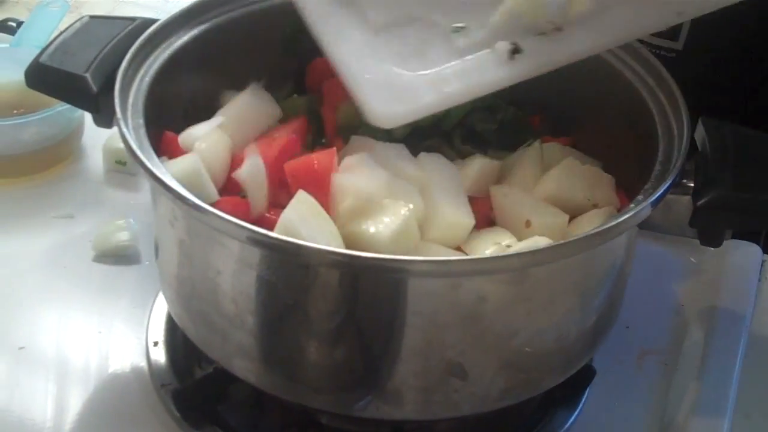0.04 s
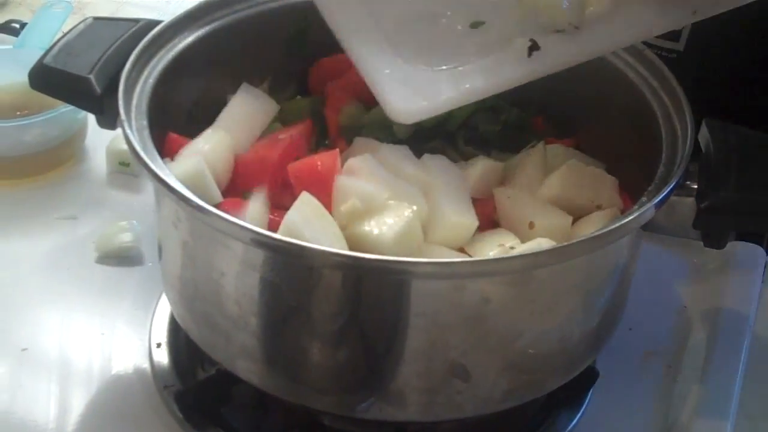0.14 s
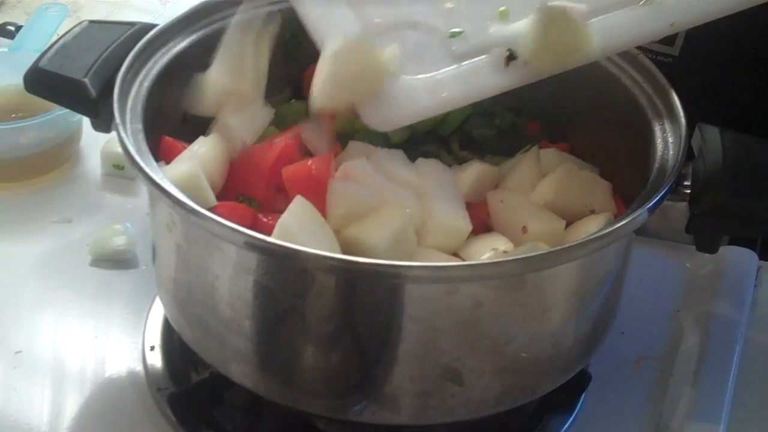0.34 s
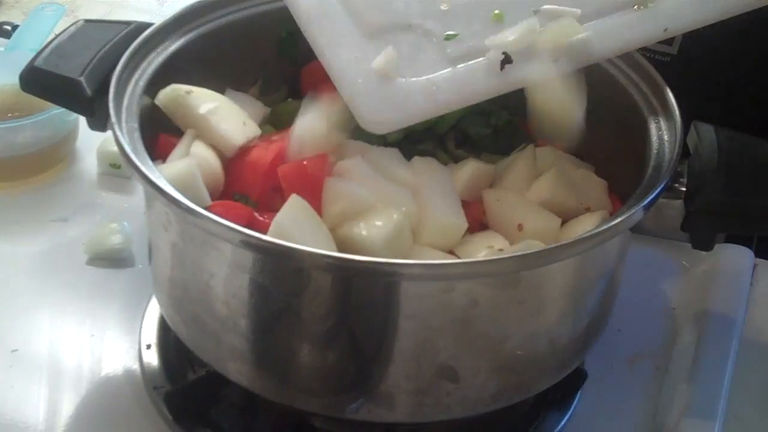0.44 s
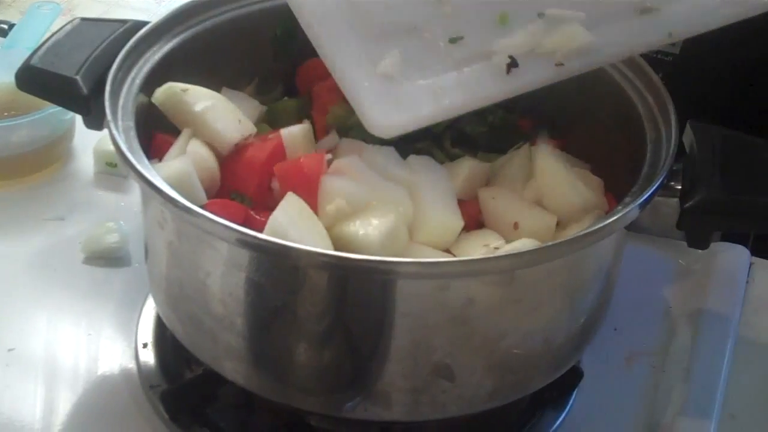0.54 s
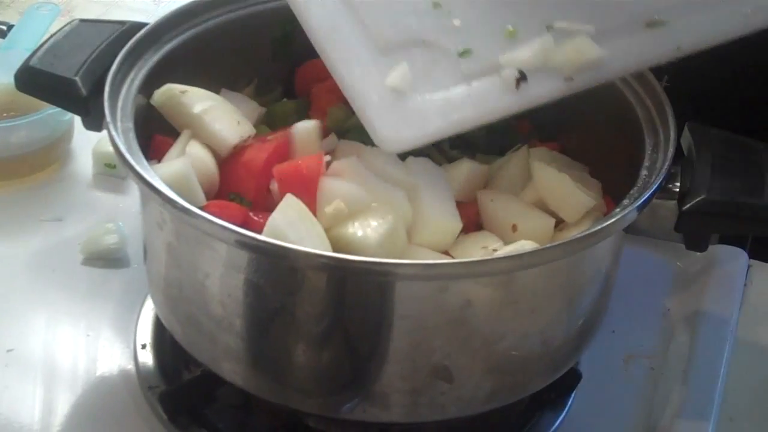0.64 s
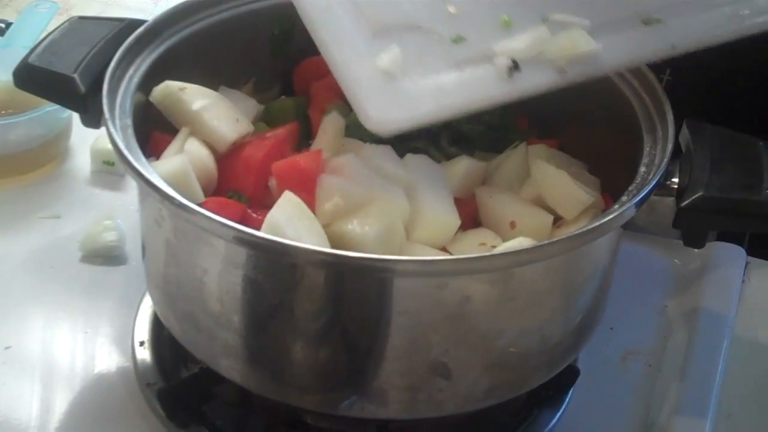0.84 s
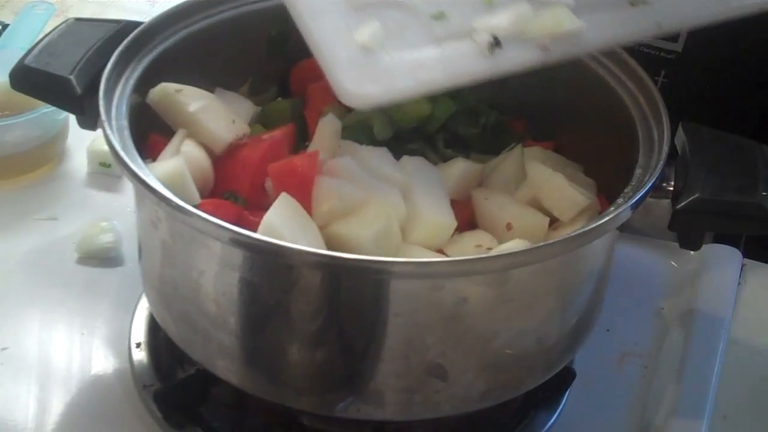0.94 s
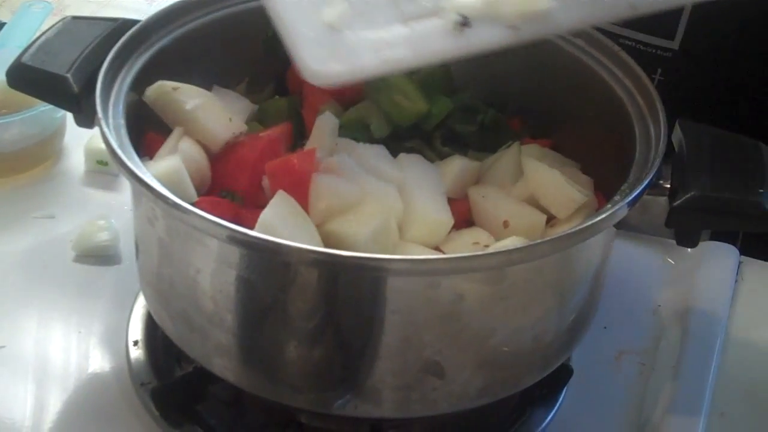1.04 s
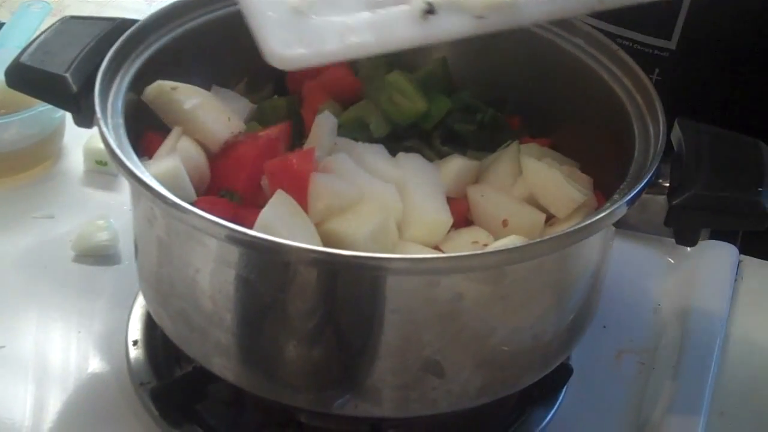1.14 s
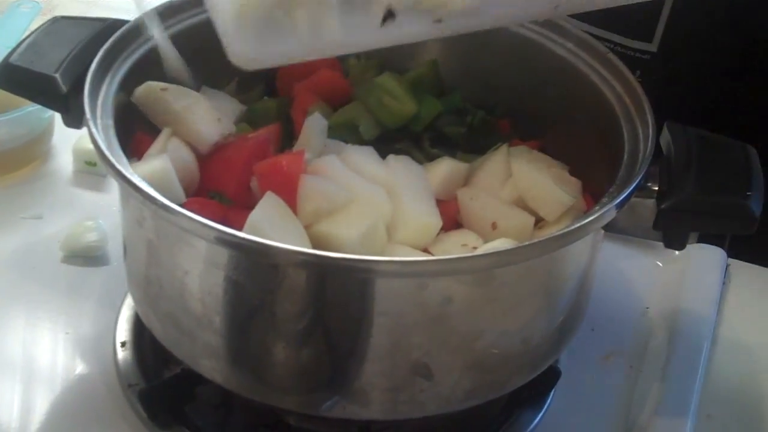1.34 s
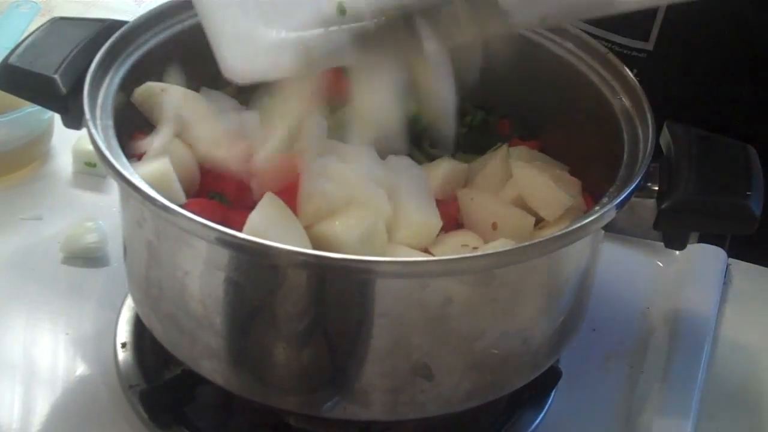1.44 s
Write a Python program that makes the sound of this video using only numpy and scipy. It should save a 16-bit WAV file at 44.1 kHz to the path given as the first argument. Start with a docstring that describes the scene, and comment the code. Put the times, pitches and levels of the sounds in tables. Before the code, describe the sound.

Two ringing knocks and a scrape of a plastic board on a pot, over faint sizzling.

```python
"""A faint sizzle, and bits of onion patting into a steel pot of vegetables in a small kitchen. One piece
brushes the pot wall and rings one faint high note. A plastic cutting board knocks twice on the rim to shed the
onion: it cracks and clacks, the pot rings. It then scrapes along the rim, tiny slips rasping the plastic and
ringing the steel, and slips off with a tick."""
import sys
import numpy as np
from scipy import signal
from scipy.io import wavfile

SR = 44100
rng = np.random.default_rng(int(sys.argv[2]) if len(sys.argv) > 2 else 0)


def transcribe(signal):
    """Save signal, clipped to [-1, 1], as a 16-bit WAV file at the path in sys.argv[1]."""
    frames = np.atleast_2d(signal).T
    limited = np.clip(frames, -1, 1)
    pcm = np.round(limited * 32767).astype(np.int16)
    wavfile.write(sys.argv[1], SR, pcm)


N = 66150
T = np.arange(N) / SR

# Sizzle spectrum: f/Hz, relative level/dB
SIZZLE_SPECTRUM = [(100, -17.5), (330, -6.5), (450, -11), (550, 0.5), (700, -18.5), (1060, 3.5), (1200, -3),
                   (1600, 5), (2250, -5.5), (3050, 4), (3800, -9.5), (5500, -10.5), (8000, -26.5),
                   (11000, -48), (13000, -13), (14000, -36)]
# Background hiss dips after the first knock, then recovers: t/s, gain/dB
BACKGROUND_DIP = [(0, 2.5), (.22, 3), (.45, -2), (.56, -2), (.7, -1), (.88, 1), (1.5, 1)]
# Room rumble spectrum: f/Hz, relative level/dB
RUMBLE_SPECTRUM = [(20, -5.5), (35, -36), (70, -26), (150, -33), (400, -48)]
# Onion landings: t/s, level/dB, t60/s, tilt/(dB per octave)
LANDINGS = [(.0395, -46.5, 0.074, -1.5), (.1615, -39.5, 0.021, 2), (.188, -47, .05, 3.5),
            (.2735, -39, 0.0096, 0), (.289, -33.5, 0.15, 1), (.321, -37, 0.059, 0), (.46, -48.5, 0.027, 3),
            (1.316, -50, 0.026, 6), (1.478, -43, 0.021, 16)]
# Pat and spit spectrum: f/Hz, relative level/dB
PAT_SPECTRUM = [(100, -32), (300, -8), (550, 14), (1500, 3.5), (3000, -2), (6500, -1.5), (10000, -14),
                (14000, -21)]
# Kitchen decay: f/Hz, t60/s
ROOM_DECAY = [(100, 0.37), (400, .34), (1500, 0.24), (5000, 0.27), (13000, 0.24)]
# Pot modes: f/Hz
MODE_HZ = [538, 595, 1255, 1452, 1592, 1922, 2178, 2307, 2773, 2813, 3619, 4080, 4461, 4715, 5188, 6310,
           6700, 7292, 7880, 8322, 9980, 10702, 11330, 11920, 13100]
# Same modes: t60/s, then relative level/dB for knock 1, knock 2, scrape, tick
MODES = [(0.34, -45, -39.5, -28.5, -56.5), (0.12, -30.5, -36, -9.5, -71), (0.3, -29, -20.5, -0.5, -55.5),
         (.14, -27, -69, -6, -52), (0.16, -33, -29, -31, -68), (0.26, -34, -43, -13, -57),
         (0.12, -22.5, -20.5, 8.5, -75), (0.035, -14.5, -59, 12.5, -59), (0.054, -17.5, -67, -28, -62),
         (0.22, -27.5, -36.5, 0.5, -49), (0.37, -38.5, -36, -21, -50), (0.091, -23, -32, 5.5, -36),
         (0.18, -26.5, -28, 1, -37.5), (.25, -38.5, -32.5, 3, -41.5), (0.05, -18.5, -29.5, -32, -60),
         (0.23, -31, -46, -1, -45.5), (0.21, -35, -40, -2, -42), (0.17, -42, -29.5, -8, -66),
         (0.13, -36.5, -42, 3, -55), (0.073, -26, -40.5, 3.5, -41), (0.08, -39, -57, -8.5, -70),
         (0.053, -26, -58, -30, -75), (0.069, -65, -36, -8, -75), (.2, -42, -80.5, -17, -73),
         (0.11, -39, -80, -11, -73)]
# Knocks: t/s, contact index, ring/dB, crack/dB, clack/dB, thump/dB, room/dB
RIM_KNOCKS = [(0.2359, 0, 0.5, -2, -13, -26.5, -8), (0.9127, 1, -0.5, -1, -17, -39, -10)]
# Board spectra, one per knock: f/Hz, relative level/dB
BOARD_SPECTRA = [
    [(100, -30), (300, -18), (560, -3.5), (680, -9.5), (1100, -2), (1800, -9.5), (2400, -8), (3600, -10),
     (4500, -13), (7000, -10.5), (9200, -25.5), (11000, -37), (14000, -33)],
    [(100, -37), (400, -20.5), (550, -5), (850, 1), (1150, -12.5), (1620, 1.5), (2000, -6), (3400, -16),
     (4400, -14.5), (5050, -7), (5800, -17.5), (8000, -23), (11500, -28), (14000, -42)],
]
# Scrape envelope: t/s, rasp level/dB, rim level/dB
SCRAPE_ENVELOPE = [(.95, -60.5, -66.5), (.99, -57, -43), (1.025, -48.5, -43.5), (1.05, -49.5, -39),
                   (1.07, -46, -43.5), (1.1, -46, -39.5), (1.15, -48.5, -45.5), (1.18, -54.5, -46),
                   (1.225, -49, -49), (1.255, -56.5, -44), (1.28, -46.5, -50), (1.31, -51, -39.5),
                   (1.355, -51.5, -42.5), (1.38, -52.5, -53), (1.41, -49.5, -52), (1.45, -52.5, -57),
                   (1.5, -56, -57.5)]
# Rasp spectrum: f/Hz, relative level/dB
RASP_SPECTRUM = [(100, -42), (300, -17.5), (520, 2), (900, -1), (1600, -10), (2200, -9), (3200, 0.5),
                 (4500, 1.5), (6000, 1.5), (8300, -5.5), (11000, -13), (13300, -23), (14000, -16)]
# Tick spectrum: f/Hz, relative level/dB
TICK_SPECTRUM = [(180, -51), (300, -4), (1200, -21), (3350, 1), (4620, -11), (5880, -9), (8500, -28),
                 (14000, -35)]


def amp(db):
    """Decibels to gain."""
    return 10 ** (np.asarray(db) / 20)


def unit(x):
    """Scale to rms 1."""
    return x / np.sqrt(np.mean(x ** 2) + 1e-20)


def read(points, hz):
    """Table lookup on a log-frequency axis."""
    f, value = np.transpose(points)
    return np.interp(np.log(hz + 1), np.log(f + 1), value)


def curve(rows, column=1):
    """Gain over time from one dB column; end values hold."""
    rows = np.array(rows)
    return amp(np.interp(T, rows[:, 0], rows[:, column]))


def delay(x, start_s):
    """Start x at start_s."""
    return np.concatenate([np.zeros(max(round(start_s * SR), 0)), x])[:N]


def colour(x, spectrum, tilt_db_per_oct=0, size=4096):
    """Minimum-phase filter of unit energy with the given spectrum."""
    hz = abs(np.fft.fftfreq(size, 1 / SR))
    gain_db = np.maximum(read(spectrum, hz) + tilt_db_per_oct * np.log2(hz + 1), -100)
    response = np.exp(np.conj(signal.hilbert(np.log(amp(gain_db)))))
    taps = np.fft.ifft(response).real[:size // 2]
    return signal.fftconvolve(x, taps / np.linalg.norm(taps))[:N]


def burst(t60_s):
    """Dense, fast-dying vibration."""
    return rng.standard_normal(N) * amp(-60 * T / t60_s)


def mode(hz, db, t60_s, phase_cycles=0):
    """One decaying sine."""
    return amp(db - 60 * T / t60_s) * np.sin(2 * np.pi * (hz * T + phase_cycles))


def clicks(per_s, spread_db):
    """Random clicks of uneven size, rms 1."""
    size = amp(spread_db * np.minimum(rng.exponential(1, N), 4))
    return unit(size * rng.choice([-1, 1], N) * (rng.random(N) < per_s / SR))


def sizzle():
    """Soft hiss from under the vegetables, with tiny spits."""
    hiss = amp(-55.5) * colour(rng.standard_normal(N), SIZZLE_SPECTRUM)
    spits = amp(-73.5) * colour(clicks(per_s=400, spread_db=-7), PAT_SPECTRUM)
    return curve(BACKGROUND_DIP) * (hiss + spits)


def rumble(level_db=-63.5):
    """Faint, steady low room noise."""
    return amp(level_db) * colour(rng.standard_normal(N), RUMBLE_SPECTRUM)


def onion():
    """Moist bits land dully."""
    return sum(delay(amp(db) * colour(burst(t60_s), PAT_SPECTRUM, tilt), start_s)
               for start_s, db, t60_s, tilt in LANDINGS)


def room(x, build_s=0.021, highpass_hz=308):
    """Kitchen reflections build up, then die away by band."""
    hz, t, bands = signal.stft(rng.standard_normal(N), SR, nperseg=256)
    bands = bands * amp(-60 * t / read(ROOM_DECAY, hz)[:, None])
    tail = signal.istft(bands, SR, nperseg=256)[1][:N] * np.minimum(T / build_s, 1)
    tail = signal.sosfilt(signal.butter(2, highpass_hz, "high", fs=SR, output="sos"), tail)
    return signal.fftconvolve(x, tail / np.linalg.norm(tail))[:N]


def wall_touch(start_s=0.162, level_db=-50.5):
    """One onion piece brushes the pot wall and wakes one faint high note, the pot's longest mode."""
    t60_s, hz = max((row[0], hz) for hz, row in zip(MODE_HZ, MODES))
    return delay(mode(hz, level_db, t60_s), start_s)


def pot_ring(contact, t60_scale=1):
    """Struck pot; the place of contact sets each mode's level."""
    return sum(mode(hz, levels_db[contact], t60_s * t60_scale, rng.random())
               for hz, (t60_s, *levels_db) in zip(MODE_HZ, MODES))


def knocks(ring_send_db=0.5):
    """Board hits rim: sharp crack, short clack, low thump, ringing pot."""
    out = np.zeros(N)
    for knock, spectrum in zip(RIM_KNOCKS, BOARD_SPECTRA):
        start_s, contact, ring_db, crack_db, clack_db, thump_db, room_db = knock
        crack = amp(crack_db) * (T == 0)
        clack = amp(clack_db) * burst(t60_s=0.036)
        board = colour(crack + clack, spectrum)
        thump = mode(hz=151, db=thump_db, t60_s=0.032)
        pot = amp(ring_db) * pot_ring(round(contact))
        reflections = amp(room_db) * room(board + amp(ring_send_db) * pot)
        out += delay(board + thump + pot + reflections, start_s)
    return out


def bounce(start_s=0.2428, level_db=-14):
    """The board strikes again just after the first knock."""
    return delay(amp(level_db) * colour(burst(t60_s=0.02), BOARD_SPECTRA[0]), start_s)


def scrape(clump_s=0.011, clump_db=1.64, contact_width_hz=19.8):
    """Clumps of tiny slips rasp the plastic and ring the rim, which the board damps."""
    clump_pole = np.exp(-1 / (clump_s * SR))
    clumps = unit(signal.lfilter([1], [1, -clump_pole], rng.standard_normal(N)))
    slips = unit(clicks(per_s=9000, spread_db=1) * amp(clump_db * clumps))
    rasp = colour(slips * curve(SCRAPE_ENVELOPE, column=1), RASP_SPECTRUM)
    free_rim = sum(mode(hz, db, t60_s, phase_cycles=0.25)
                   for hz, (t60_s, _, _, db, _) in zip(MODE_HZ, MODES))
    damped_rim = free_rim * np.exp(-np.pi * contact_width_hz * T)
    rim_drive = slips * curve(SCRAPE_ENVELOPE, column=2)
    return rasp + signal.fftconvolve(rim_drive, damped_rim / np.linalg.norm(damped_rim))[:N]


def tick(start_s=1.4203):
    """The board's edge slips off the rim: a snap and a damped ring."""
    snap = amp(-46) * colour(burst(t60_s=0.039), TICK_SPECTRUM)
    pot = amp(1.5) * pot_ring(contact=3, t60_scale=0.43)
    return delay(snap + pot, start_s)


def scene(room_db=-22.5):
    """Mono mix; the light contacts share one reverb."""
    light = scrape() + tick() + onion() + wall_touch()
    return (rumble() + knocks() + bounce() + light + amp(room_db) * room(light) + sizzle())[None]


def record(dry, cutoff_hz=14000):
    """Steep linear-phase low-pass."""
    taps = signal.firwin(511, cutoff_hz, window=("kaiser", 9), fs=SR)
    return signal.oaconvolve(dry, taps[None], "same")


dry = scene()
out = record(dry)
transcribe(out)
```